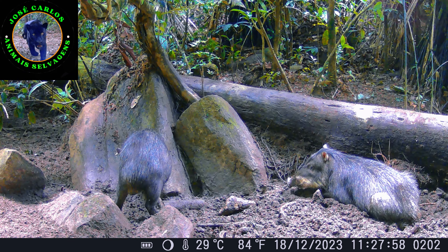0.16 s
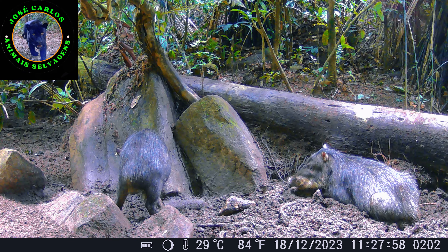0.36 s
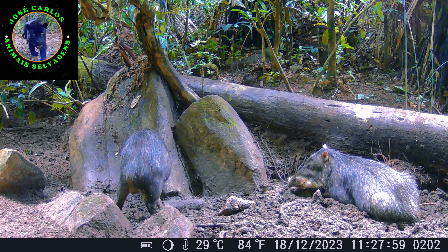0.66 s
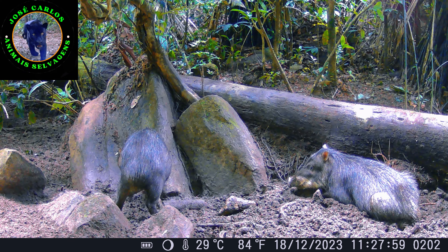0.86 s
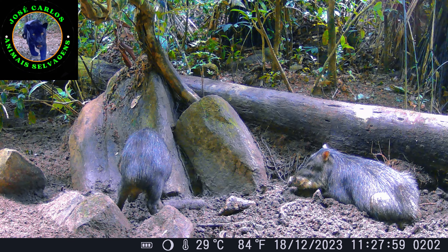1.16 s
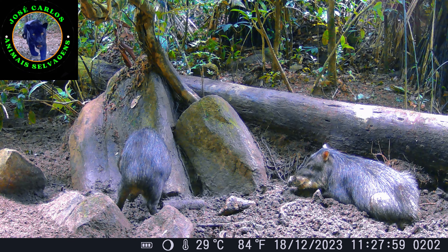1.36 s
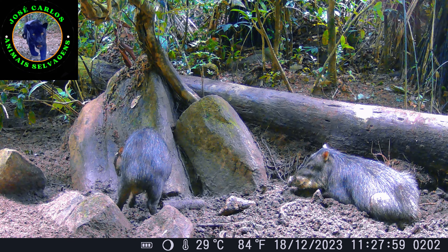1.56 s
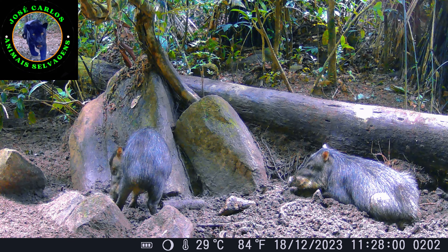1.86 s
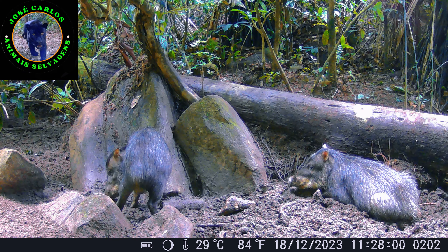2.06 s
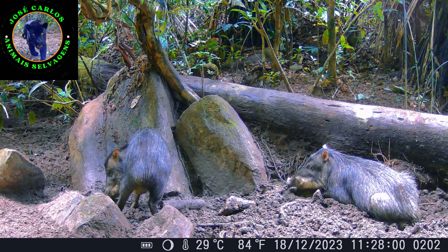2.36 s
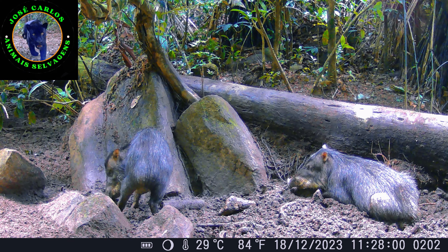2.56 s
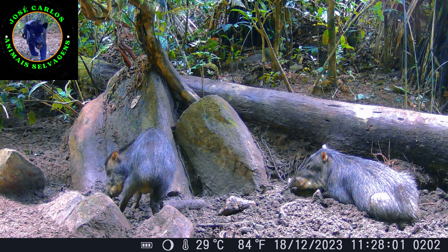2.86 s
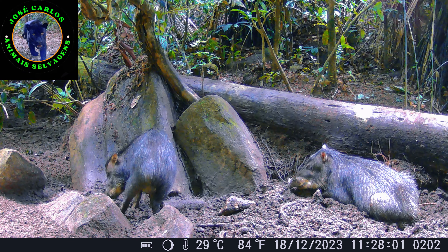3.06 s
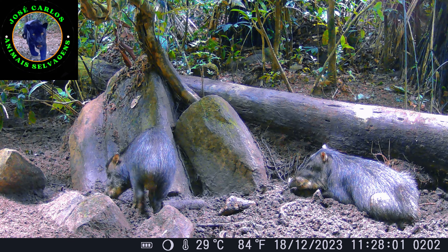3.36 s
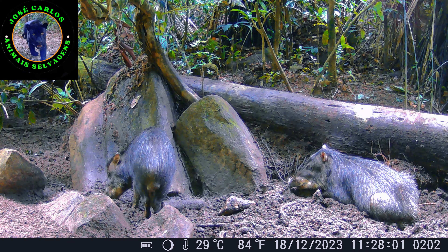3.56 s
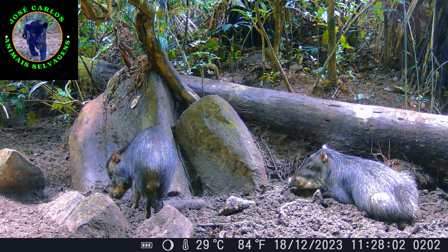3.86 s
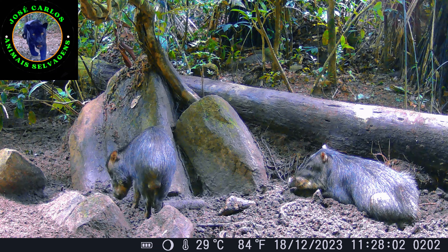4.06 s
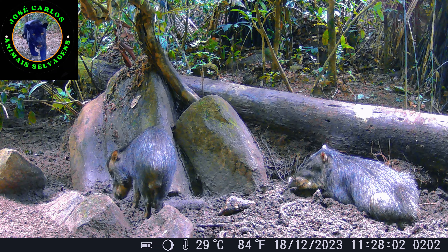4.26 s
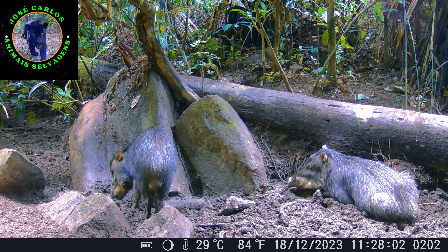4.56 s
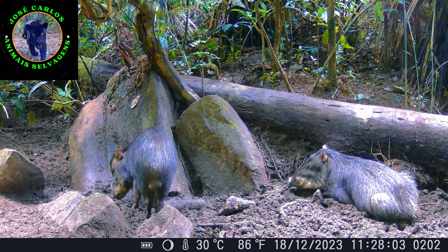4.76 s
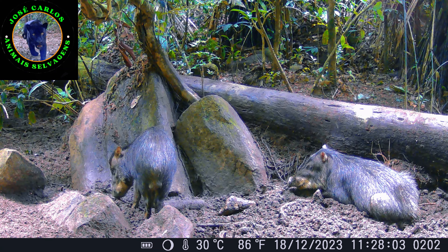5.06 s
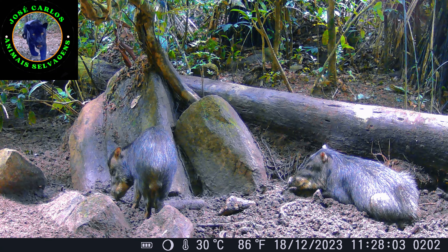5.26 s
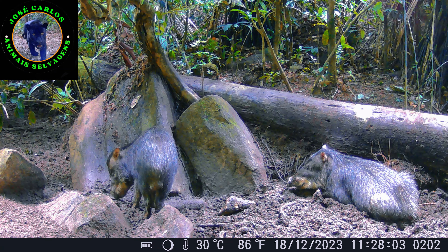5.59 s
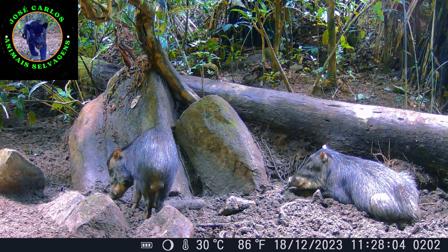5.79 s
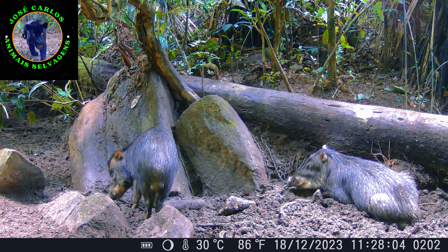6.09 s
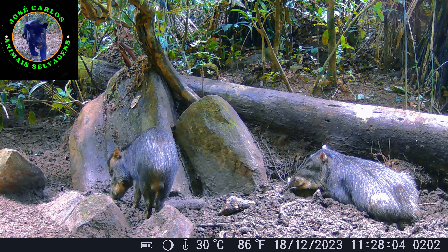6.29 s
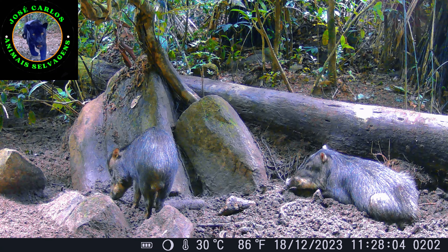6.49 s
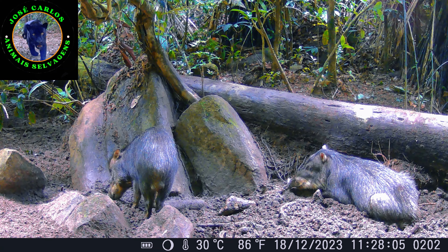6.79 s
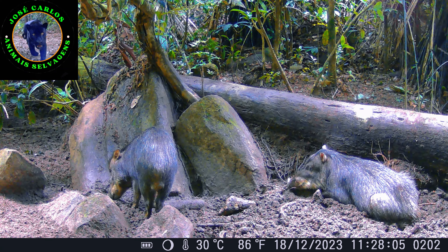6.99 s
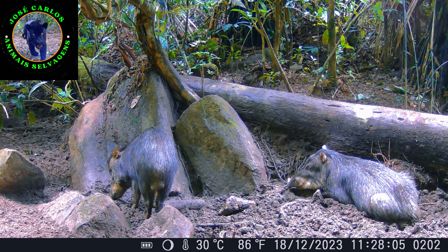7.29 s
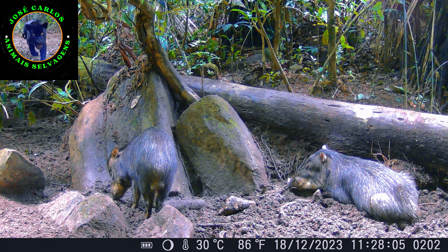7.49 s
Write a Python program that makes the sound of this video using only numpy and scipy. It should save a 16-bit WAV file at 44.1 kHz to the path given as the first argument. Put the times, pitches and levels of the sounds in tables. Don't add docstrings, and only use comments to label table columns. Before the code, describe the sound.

A peccary clacks its tusks loudly, then grunts and barks softly in an echoing forest while birds chirp, trill and whistle over insects.

```python
import sys
import numpy as np
from scipy import signal
from scipy.fft import rfft, irfft
from scipy.io import wavfile
from scipy.ndimage import uniform_filter1d

SR = 44100
rng = np.random.default_rng(int(sys.argv[2]) if len(sys.argv) > 2 else 0)


def attenuation_scalar(level_db):
    decades = np.asarray(level_db, float) / 20
    return 10 ** decades


def wav_out(sig):
    wavfile.write(sys.argv[1], SR, np.round(np.clip(np.atleast_2d(sig).T, -1, 1) * 32767).astype(np.int16))


N = 336741
LEAD = SR // 4
M = N + LEAD

# [t/s, mouth boom level/dB, mouth f/Hz, mouth t60/s, tusk level/dB]
CLACKS = [
    (-.13, -28, 530, .07, -6),
    (0.1178, -11.5, 514, 0.042, -13),
    (0.1699, -3.5, 532, 0.045, -0.5),
    (2.5558, -25.5, 735, 0.038, -20),
    (6.509, -17, 502, 0.052, -19.5),
    (6.562, -18, 683, 0.0069, -17),
]


def read(points, hz):
    f, value = np.transpose(points)
    return np.interp(np.log(hz + 1), np.log(f + 1), value)


def evened(x):
    return x / np.sqrt(np.mean(x ** 2) + 1e-20)


def peaked(x):
    return x / np.abs(x).max()


def add(mix, s, sound):
    part = mix[round(s * SR) + LEAD:][:len(sound)]
    part += sound[:len(part)]


def resonate(x, hz, width):
    turn = np.exp(2j * np.pi * np.cumsum(hz * np.ones(len(x))) / SR)
    r = np.exp(-np.pi * width / SR)
    return 2 * (turn * signal.lfilter([1 - r], [1, -r], x / turn + 1e-18)).real


def ring(hz, db, t60, t):
    return attenuation_scalar(db - 60 * t / t60) * np.sin(2 * np.pi * hz * t)


def echo(x, decays, start_s, build_s):
    taps = np.zeros(2 * SR)
    at = np.arange(0, 2 * SR - 20, 20)
    taps[at + rng.integers(0, 20, len(at))] = rng.choice([-1., 1.], len(at))
    hz, t, z = signal.stft(taps, SR, nperseg=256)
    tail = signal.istft(z * attenuation_scalar(-60 * t / read(decays, hz)[:, None]), SR, nperseg=256)[1]
    since_start = np.maximum(np.arange(len(tail)) / SR - start_s, 0)
    tail *= 1 - np.exp(-since_start / build_s)
    return signal.fftconvolve(x, tail / np.linalg.norm(tail))[:M]


def rumble():
    # [f/Hz, level per Hz/dB]
    colour = [(25, -7.5), (60, 3), (100, -4), (300, -9), (1000, -17.5), (2200, -20), (2900, -29),
              (4000, -38), (5000, -51), (5800, -30), (6500, -38), (7300, -28.5), (8300, -28), (9000, -32)]
    hz = np.fft.rfftfreq(1024, 1 / SR)
    a, b, patches = rng.standard_normal((3, 513, M // 256 + 5))
    patches = uniform_filter1d(uniform_filter1d(patches, 10, 0), 14, 1)
    level_db = read(colour, hz)[:, None] + 2.8 * evened(patches)
    noise = signal.istft((a + 1j * b) * attenuation_scalar(level_db), nperseg=1024, noverlap=768)[1][:M]
    return attenuation_scalar(-50.5) * evened(noise)


def insects():
    # [f/Hz, width/Hz, level/dB, clicks per s]
    choruses = [(7806, 330, -70, 450), (5838, 830, -84, 1900)]
    out = np.zeros(M)
    for f, width, db, rate in choruses:
        clicks = (rng.random(M) < rate / SR) * rng.standard_normal(M)
        clicks *= attenuation_scalar(2.0 * np.minimum(rng.exponential(1, M), 4))
        out += attenuation_scalar(db) * evened(resonate(resonate(clicks, f, width), f, 2 * width))
    return out


def crack(t):
    # [f/Hz, level/dB]
    colour = [(60, -58), (420, -18), (800, 1), (2300, -5), (3600, 0), (4600, -25.5), (6000, -18),
              (9000, -33)]
    burst = rng.standard_normal(len(t)) * np.exp(-t / 0.0055) * (1 - np.exp(-t / 0.00006))
    coloured = irfft(rfft(burst) * attenuation_scalar(read(colour, np.fft.rfftfreq(len(t), 1 / SR))), len(t))
    return coloured * np.exp(-t / .03)


def clacks():
    # [f/Hz, level/dB, t60/s]
    tusk_modes = [(1116, 4.5, 0.024), (1330, 3.5, 0.035), (1860, -23.5, 0.029), (2232, 9, 0.016),
                  (2400, -19.5, .02), (3200, -6, 0.024), (3330, -7.5, 0.024), (4540, -13.5, .01),
                  (5740, -5.5, 0.0068), (7160, -10, 0.0081)]
    out, t = np.zeros(M), np.arange(SR // 4) / SR
    for s, mouth_db, hz, t60, tusk_db in CLACKS:
        boom = ring(hz, 0, t60, t)
        boom -= ring(hz * 1.099, -2.45, 0.98 * t60, t)
        boom += ring(hz * 0.56, -15.5, 0.2 * t60, t)
        tusk = np.zeros(len(t))
        for f, db, decay in tusk_modes:
            tusk += ring(f * (1 + 0.024 * rng.standard_normal()), db, decay, t)
        add(out, s, attenuation_scalar(mouth_db) * peaked(boom))
        add(out, s, attenuation_scalar(tusk_db - 8.5) * peaked(tusk))
        add(out, s + 0.001771, attenuation_scalar(tusk_db - 3.0) * peaked(tusk))
        add(out, s + 0.00037, attenuation_scalar(tusk_db - 5.0) * peaked(crack(t)))
    return out


def slap():
    # [f/Hz, level/dB]
    wide = [(300, -26), (900, -12), (2300, -5.5), (3600, 2), (4600, -17.5), (7500, -4.5), (9000, -16.5)]
    out, hz = np.zeros(M), np.fft.rfftfreq(256, 1 / SR)
    knock = np.fft.fftshift(irfft(attenuation_scalar(read(wide, hz))))
    for s, *_, tusk_db in CLACKS:
        add(out, s, attenuation_scalar(tusk_db) * peaked(knock))
    return out


def voice(rate, swell_s, fade_s, jitter, rough):
    before = round(.2 * SR)
    t = np.arange(-before, round(.3 * SR)) / SR
    drift = evened(uniform_filter1d(rng.standard_normal(len(t)), 500))
    turns = np.cumsum(rate * np.exp(-1.5 * np.abs(t)) * (1 + jitter * drift)) / SR
    turns -= turns[before]
    pulses = np.diff(np.floor(turns), prepend=np.floor(turns[0])) * np.sqrt(SR / rate)
    puffs = np.exp(-(turns % 1) / 2.1) * rng.standard_normal(len(t))
    shape = np.exp(-(t / np.where(t < 0, swell_s, fade_s)) ** 2)
    return t, pulses + rough * puffs, shape


def formant(x, t, hz, width, fall):
    return resonate(resonate(x, hz * np.exp(-fall * t), width), hz, 3 * width)


def chest(t, drive, length_s):
    hum = resonate(resonate(drive, 92 * np.exp(-1.2 * t), 45), 64, 53)
    push = resonate(resonate(drive, 55, 54), 49, 67)
    return peaked((hum + attenuation_scalar(-12.5) * push) * np.exp(-((t - 0.019) / length_s) ** 2))


def grunts():
    # [t/s of the strongest pulse, throat level/dB, length/s, chest level/dB]
    breaths = [(0.092, -39, 0.066, -40), (.495, -32, 0.045, -47), (0.766, -37.5, 0.069, -46),
               (1.209, -41, 0.034, -42.5), (1.49, -49.5, 0.052, -42), (1.717, -39, 0.037, -41),
               (1.884, -50, 0.1, -42.5), (2.108, -48, 0.092, -45.5), (2.283, -37, 0.051, -48),
               (2.533, -40, 0.095, -43), (2.768, -36, 0.063, -50), (3.005, -32, 0.036, -46),
               (3.255, -35, 0.095, -45.5), (3.454, -39.5, 0.13, -45), (3.708, -34, 0.078, -43.5),
               (3.943, -35.5, 0.082, -43), (4.173, -32.5, 0.097, -42), (4.43, -32, 0.08, -44),
               (6.16, -38.5, 0.066, -32.5), (7.028, -31.5, 0.048, -43), (7.243, -33.5, 0.068, -40),
               (7.458, -37, .13, -49.5), (7.608, -44.5, 0.08, -47)]
    # [f/Hz, width/Hz, level/dB]
    throat_modes = [(416, 111, -1), (243, 103, -2), (950, 650, -26.5)]
    out = np.zeros(M)
    for s, throat_db, length_s, chest_db in breaths:
        rate = 66 * (length_s / .07) ** -0.2295
        t, drive, shape = voice(rate, 0.64 * length_s, 0.36 * length_s, jitter=0.056, rough=.45)
        throat = np.zeros(len(t))
        for k, (f, width, db) in enumerate(throat_modes):
            throat += (-1) ** k * attenuation_scalar(db) * formant(drive * shape, t, f, width, 2.5)
        add(out, s + t[0], attenuation_scalar(throat_db) * peaked(throat) + attenuation_scalar(chest_db) * chest(t, drive, 0.033))
    return out


def barks():
    # [t/s, throat level/dB, pulses per s, mouth f/Hz, chest level/dB]
    bursts = [
        (4.654, -32, 75, 463, -37),
        (4.906, -34.5, 45, 516, -35.5),
        (5.172, -33, 46.6, 570, -36),
        (5.393, -24, 126, 533.6, -29),
        (5.66, -27, 80, 577, -40.5),
        (5.772, -37, 80, 610, -65),
        (5.937, -17, 190, 574, -29.5),
        (6.179, -18.5, 165, 501, -46.5),
    ]
    # [multiple of mouth f, width/Hz, level/dB]
    mouth_modes = [(1, 115, 6.5), (1.55, 200, -2.5), (2.3, 302, -5.5)]
    out = np.zeros(M)
    for s, throat_db, rate, hz, chest_db in bursts:
        upper_db = 1 if rate > 105 else -12.5
        t, drive, shape = voice(rate, 0.0029, 2.76 / rate, jitter=0.14, rough=1.3)
        shape += attenuation_scalar(-21) * (t > 0) * np.exp(-t / 0.063)
        mouth = np.zeros(len(t))
        for k, (multiple, width, db) in enumerate(mouth_modes):
            level = attenuation_scalar(db + upper_db * (k > 0))
            mouth += (-1) ** k * level * formant(drive * shape, t, hz * multiple, width, 2.2)
        throat = resonate(resonate(drive * shape, 240, 200), 210, 330)
        mouth -= attenuation_scalar(1 + 10 * np.log10(100 / rate)) * throat
        low = chest(t, drive * (t > 0), 0.038)
        add(out, s + t[0], attenuation_scalar(throat_db) * peaked(mouth) + attenuation_scalar(chest_db) * low)
    return out


def whistle(rows, wobble_hz):
    s, hz, db = np.transpose(rows)
    t = np.arange(s[0], s[-1], 1 / SR)
    hz = uniform_filter1d(np.interp(t, s, hz), 250, mode="nearest")
    hz += wobble_hz * evened(uniform_filter1d(rng.standard_normal(len(t)), 200))
    tone = np.sin(2 * np.pi * np.cumsum(hz) / SR) * signal.windows.tukey(len(t), .04)
    return s[0], np.sqrt(2) * attenuation_scalar(np.interp(t, s, db)) * tone


def glide(s, length_s, first_hz, last_hz, db, bend, swell):
    u = np.linspace(0, 1, 21)
    hz = first_hz + u ** bend * (last_hz - first_hz)
    return np.transpose([s + u * length_s, hz, db + np.interp(u, *np.transpose(swell))])


def flicker(depth_db):
    waver = uniform_filter1d(uniform_filter1d(rng.standard_normal(M), 900), 900)
    return attenuation_scalar(depth_db * evened(waver))


def held_notes():
    # [t/s, length/s, first f/Hz, last f/Hz, level/dB]
    calls = [
        (.067, .36, 2187, 2020, -59),
        (2.028, 0.64, 3690, 3710, -69.5),
        (2.3, 0.42, 1886, 1780, -64.5),
        (5.015, 0.34, 1097, 934, -50.5),
        (3.8, .24, 899, 837, -60.5),
        (5.87, 0.3, 5030, 5090, -70.5),
    ]
    # [share of length, level/dB]
    hold = [(0, -3), (.05, -1), (.7, -2), (1, -5)]
    out = np.zeros(M)
    for row in calls:
        add(out, *whistle(glide(*row, 0.97, hold), 30))
    return out * flicker(1.6)


def trills():
    # [t/s, level/dB]
    starts = [(.1, -61), (0.391, -64.5), (.66, -65), (.95, -66), (1.23, -65), (1.529, -64), (1.821, -64.5),
              (2.11, -65)]
    # [t/s, f/Hz, level/dB]
    course = [(0, 4320, -7), (.045, 4580, -5), (.09, 4720, -8), (.11, 4520, -9), (.17, 4720, -8),
              (.21, 4600, -16)]
    out = np.zeros(M)
    for s, db in starts:
        add(out, *whistle(np.add(course, (s, 0, db)), 125))
    return out


def chirps():
    # [t/s, length/s, first f/Hz, level/dB]
    calls = [(0.632, 0.22, 2344, -57), (1.179, .25, 2390, -55.5), (1.735, 0.21, 2418, -53.5),
             (2.307, .21, 2487, -52), (2.83, .045, 2480, -59.5), (2.874, .16, 2414, -55.5),
             (3.345, 0.2, 2491, -53.5), (3.864, 0.21, 2520, -53.5), (4.368, 0.22, 2526, -53.5),
             (4.899, .23, 2528, -54), (5.401, 0.21, 2520, -52)]
    # [share of length, level/dB]
    swell = [(0, -9.5), (.2, -1), (.6, -0.5), (.92, -5), (1, -2)]
    out = np.zeros(M)
    for s, length_s, first_hz, db in calls:
        add(out, *whistle(glide(s, length_s, first_hz, 1957, db, 1.3, swell), 15.3))
    return out * flicker(1.1)


def hidden_bird():
    # [t/s, f/Hz, level/dB]
    course = [(3.22, 2078, -53), (3.25, 1678, -53), (3.3, 1430, -61), (3.36, 1405, -68)]
    out = np.zeros(M)
    add(out, *whistle(course, 26))
    return out


def loud_whistler():
    # [t/s, f/Hz]
    pitches = [
        [(5.485, 1490), (5.5, 1696), (5.555, 2677), (5.6, 3470), (5.64, 3890), (5.7, 4400), (5.87, 4850)],
        [(6.105, 1630), (6.12, 1800), (6.15, 2340), (6.18, 3020), (6.192, 3850), (6.2, 4670), (6.215, 5100)],
        [(6.365, 3957), (6.45, 3140), (6.515, 2495), (6.55, 1908), (6.58, 1514), (6.62, 1356), (6.7, 1361),
         (6.86, 1340)],
    ]
    # [level/dB, attack/s, attack start level/dB, share of the loudness law]
    efforts = [(2, 0.012, -13, 1.12), (-1, 0.026, -11.5, .8), (7, 0.23, -21, 0.99)]
    # [f/Hz, level/dB]
    loudness_law = [(1345, -38.5), (1375, -13.5), (1550, -6.5), (1900, -1), (2500, -2.5), (3200, -8),
                    (4100, -26.5), (4600, -41)]
    out = np.zeros(M)
    for pitch, (db, attack_s, start_db, share) in zip(pitches, efforts):
        s, hz = np.transpose(pitch)
        t = np.arange(s[0], s[-1], .002)
        hz = np.interp(t, s, hz)
        attack = start_db * np.maximum(1 - (t - s[0]) / attack_s, 0)
        level = -31 + db + share * read(loudness_law, hz) + attack
        add(out, *whistle(np.transpose([t, hz, level]), 16))
    return out


def birds():
    # [f/Hz, t60/s]
    leaves = [(1000, 0.026), (5000, 0.029)]
    # [f/Hz, t60/s]
    forest = [(1000, 1.04), (2000, 1.25), (3000, 1.16), (4500, 1.6)]
    held, trill, chirp, hidden, loud = held_notes(), trills(), chirps(), hidden_bird(), loud_whistler()
    direct = attenuation_scalar(-5.3) * loud + attenuation_scalar(-1.0) * chirp + attenuation_scalar(-3.0) * held
    to_leaves = attenuation_scalar(-7) * loud + attenuation_scalar(-5) * chirp + attenuation_scalar(-8) * held + trill + attenuation_scalar(-8) * hidden
    to_forest = attenuation_scalar(-0.17) * loud + attenuation_scalar(-3.0) * chirp + attenuation_scalar(-7.5) * held
    to_forest += attenuation_scalar(-8.0) * trill + attenuation_scalar(4) * hidden
    return direct + echo(to_leaves, leaves, 0.00091, 0.0028) + echo(to_forest, forest, 0.0024, 0.0037)


def contact():
    return (0.62 + rng.standard_normal(2000)) * (np.arange(2000) / SR < .0015)


def pop(burst, hz):
    return peaked(resonate(resonate(resonate(burst, hz, 270), hz, 600), hz, 900))


def smacks():
    # [t/s, peak level/dB, f/Hz]
    lips = [(0.537, -45, 1430), (0.602, -44, 1413), (.738, -35, 530), (0.744, -42.5, 1240),
            (1.09, -46, 1874), (1.113, -45, 1660), (1.154, -40.5, 1590), (1.32, -44.5, 1200),
            (2.242, -42, 1390), (2.88, -47, 1444), (3.004, -50, 1094), (3.224, -46, 1700),
            (3.737, -47, 1423), (3.989, -44, 1740), (4.38, -46, 1717), (4.419, -52.5, 1600),
            (4.937, -34, 544), (2.468, -50, 1400), (2.557, -27, 490), (2.557, -35, 1860),
            (2.655, -50, 1450), (5.581, -36, 1320), (4.959, -43, 1700), (5.029, -45, 1600),
            (5.284, -37.5, 1480), (5.271, -46, 1450), (5.34, -49, 1400), (7.076, -44.5, 2000),
            (7.099, -40, 1620)]
    out = np.zeros(M)
    for s, db, hz in lips:
        add(out, s, attenuation_scalar(db) * pop(contact(), hz))
    return out


def hoof_ticks():
    # [t/s, peak level/dB, low f/Hz, high f/Hz]
    steps = [(.649, -38, 1170, 2140), (.668, -44, 1070, 4080), (1.1903, -28.5, 1100, 1800),
             (1.654, -46, 2150, 3200), (1.7015, -40.5, 1390, 3530), (1.7345, -36.5, 990, 1750),
             (1.749, -43, 1710, 3200), (3.973, -39.5, 1670, 2154), (4.977, -37.5, 1550, 2200),
             (5.254, -41, 1500, 2270)]
    out = np.zeros(M)
    for s, db, low_hz, high_hz in steps:
        burst = contact()
        dull_db = -7 * np.log2(high_hz / low_hz)
        tick = pop(burst, low_hz) + attenuation_scalar(dull_db) * pop(burst, high_hz)
        touching = burst != 0
        grit = burst - burst[touching].mean() * touching
        for width in (1500, 2000, 2500):
            grit = peaked(resonate(grit, (low_hz + high_hz) / 2, width))
        add(out, s, attenuation_scalar(db) * peaked(tick + attenuation_scalar(-7) * grit))
    return out


def scene():
    # [f/Hz, t60/s]
    clearing = [(200, .12), (600, 0.15), (1200, 0.16), (2500, 0.27), (5000, 0.11), (8000, 0.1)]
    # [f/Hz, t60/s]
    deep = [(1000, 1), (3000, 0.71), (5000, 0.54), (8000, 0.32)]
    hard = signal.sosfilt(signal.butter(2, 200, "high", fs=SR, output="sos"), clacks())
    wide = slap()
    voice_lowpass = signal.butter(4, 1900, fs=SR, output="sos")
    soft = signal.sosfilt(voice_lowpass, grunts() + barks())
    pops = smacks() + hoof_ticks()
    to_clearing = attenuation_scalar(-18) * hard + attenuation_scalar(-9.5) * wide + attenuation_scalar(-15.0) * pops + attenuation_scalar(-10.5) * soft
    near = echo(to_clearing, clearing, 0.0073, 0.0023)
    far = echo(attenuation_scalar(-13) * wide, deep, 0.021, 0.028)
    return (hard + pops + soft + near + far + birds() + rumble() + insects())[None, LEAD:]


def band_limit(x):
    return signal.sosfilt(signal.butter(12, 15720, fs=SR, output="sos"), x)


def record(dry):
    lowpass = signal.firwin(401, 8395, window=("kaiser", 11), fs=SR)
    narrow = signal.oaconvolve(dry, lowpass[None], "same")
    excess = np.maximum(np.abs(narrow) - .78, 0)
    narrow = narrow - .4 * np.sign(narrow) * excess
    hiss = signal.lfilter([1], [1, -.6], rng.standard_normal(dry.shape))
    return band_limit(np.clip(narrow + attenuation_scalar(-83) * hiss, -1, 1))


dry = scene()
out = record(dry)
wav_out(out)
```